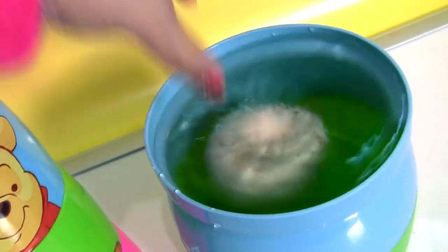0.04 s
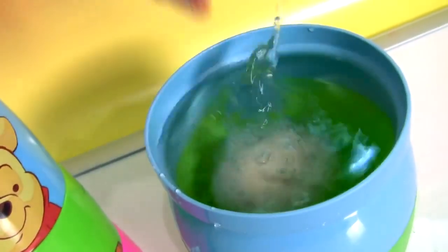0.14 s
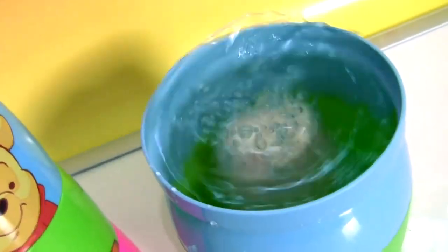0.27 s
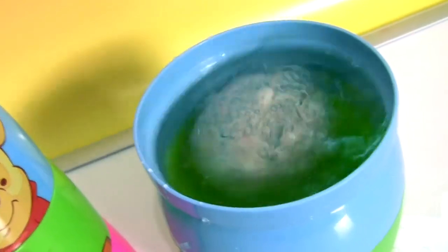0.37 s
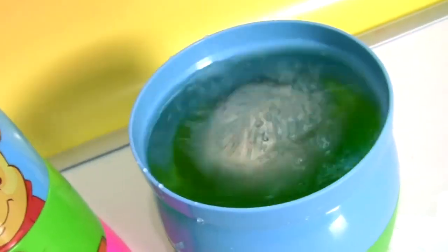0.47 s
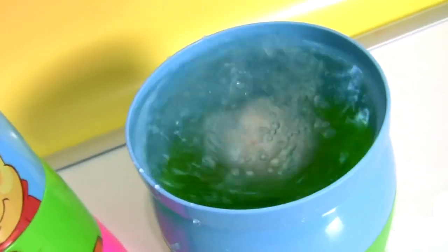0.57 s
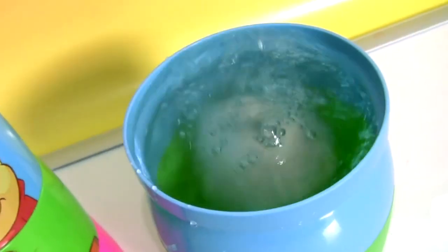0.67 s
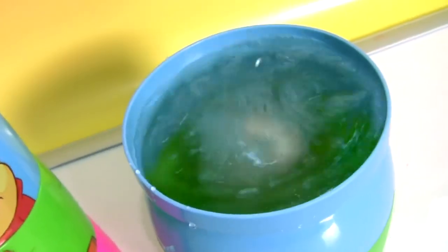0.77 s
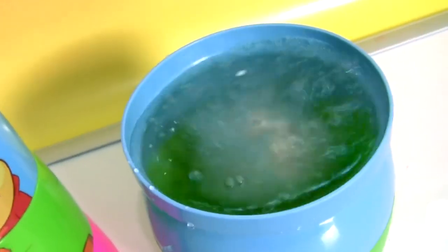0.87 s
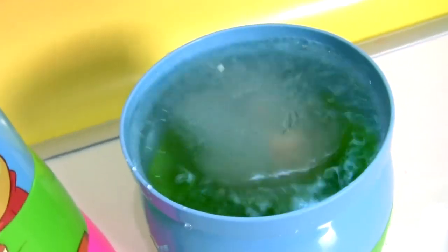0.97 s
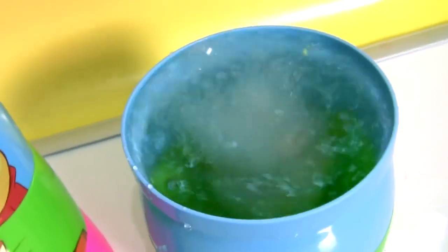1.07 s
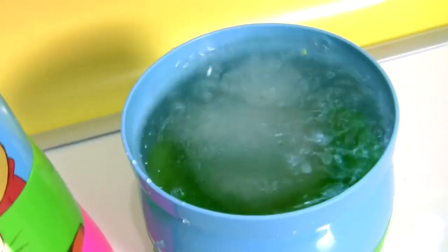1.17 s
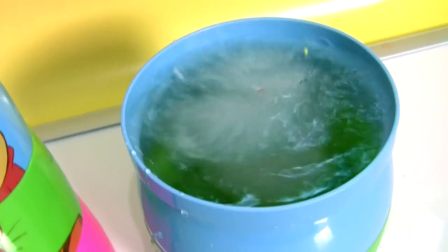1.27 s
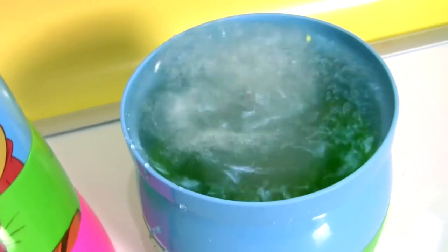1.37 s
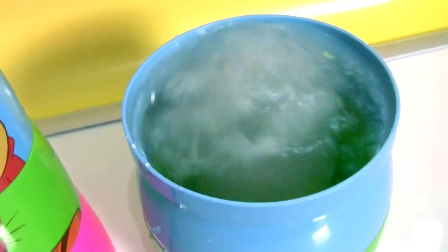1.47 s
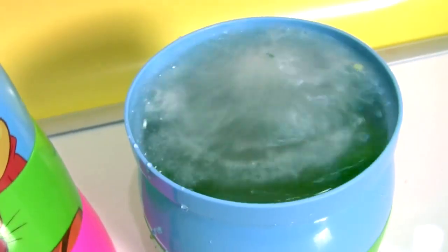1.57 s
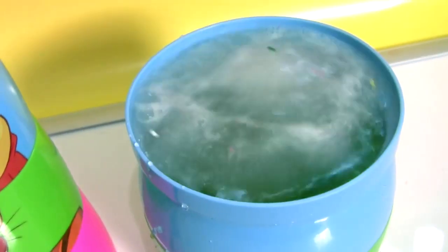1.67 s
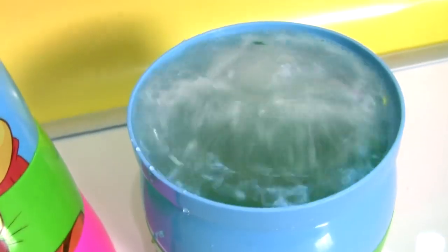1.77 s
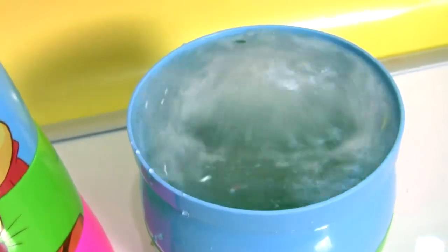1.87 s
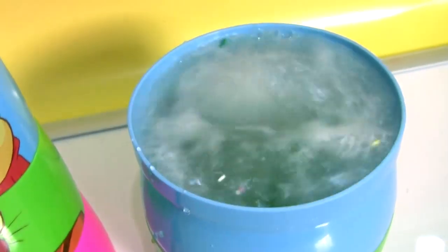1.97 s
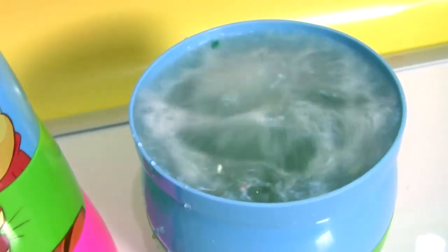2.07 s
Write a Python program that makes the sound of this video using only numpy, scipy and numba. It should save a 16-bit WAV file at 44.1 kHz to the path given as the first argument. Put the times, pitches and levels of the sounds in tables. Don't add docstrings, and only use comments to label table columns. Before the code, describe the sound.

A bath bomb slaps into water in a plastic bowl and knocks the bottom hard, then bumps softly as it rocks; water gurgles, lone bubbles pop, and fizz thickens. Close stereo microphone, small faintly humming room.

```python
import sys
import numpy as np
from scipy import signal
from scipy.fft import rfft, irfft
from scipy.io import wavfile
from scipy.ndimage import uniform_filter1d
from numba import njit

SR = 44100
rng = np.random.default_rng(int(sys.argv[2]) if len(sys.argv) > 2 else 0)


def transcribe(u):
    v = np.clip(np.atleast_2d(u).T, -1, 1)
    q = np.round(v * 32767).astype(np.int16)
    wavfile.write(sys.argv[1], SR, q)


def volts(x):
    e = np.asarray(x, float) / 20
    return 10 ** e


N = 92610

# freq_hz, density_db (per Hz)
HUM_SPECTRUM = [(45, -5.5), (170, -16), (300, -8), (430, -13.5), (740, -21.5), (1600, -18.5), (4500, -33.5),
                (15000, -44.5)]
# time_s, gurgle_level_db, slosh_level_db
STIRRING = [(.0, -63.5, -101), (.2, -57.5, -66.5), (.3, -55, -56), (.6, -58, -56), (.9, -52, -61.5),
            (1.2, -53.5, -75.5), (1.6, -58, -69), (2.1, -58.5, -68)]
# freq_hz, width_hz, level_db
BOWL_HOLLOW = [(120, 21, -11.5), (198, 20, -13), (315, 21, 0), (528, 91, -2.5), (735, 50, 8.5),
               (648, 260, 0.5), (1450, 25, -36)]
# start_s, level_db, centre_hz, rise_s, t60_s
SPLASHES = [(0.1503, -44, 1300, 0.0006, 0.045), (.1496, -47, 6500, .0005, .02),
            (0.2416, -28, 2400, 0.003, 0.05), (.2470, -37, 5400, .0005, 0.015),
            (0.253, -31, 3220, 0.00073, 0.032), (0.257, -42, 1200, 0.0057, 0.28),
            (0.262, -49, 457, 0.0044, 0.66), (.7835, -43, 2400, 0.002, 0.03), (.79, -54, 2500, .004, .15),
            (.256, -46, 2600, .004, .3), (.262, -41, 120, 0.0066, 0.43),
            (0.783, -49.5, 7100, 0.00086, 0.047), (1.1115, -45, 1450, 0.003, 0.035),
            (1.112, -50, 2600, .003, .03), (1.141, -56, 1600, .003, .06), (1.253, -50, 1500, .012, 0.1),
            (1.275, -53, 1700, .004, .03), (1.255, -53, 3000, 0.009, .1)]
# start_s, level_db, pitch_hz,
# length_cycles, pitch_rise (fraction)
DROPS = [(0.1497, -22, 1250, 1.6, 0.054), (.1498, -25, 5500, 1.1, .02), (.1511, -34, 4500, 1.5, .02),
         (.158, -46, 9000, 9., 0.035), (0.1646, -42, 2800, 22, .02), (.168, -54, 6800, 16, .02),
         (.176, -55, 6900, 16, .04), (0.554, -39, 6060, 20, 0.053), (.560, -54, 1950, 30, 0.3),
         (0.571, -40, 1180, 5.5, 0.11), (.613, -54, 2250, 35, 0.25), (.634, -55, 2550, 22, .16),
         (.670, -54, 2300, 38, 0.2), (1.398, -53, 3050, 10, .03), (1.447, -48, 2330, 24, 0.029),
         (1.466, -47.5, 3780, 25, 0.041), (1.5098, -37, 650, 2.6, .05), (1.1132, -44, 1400, 4, .03),
         (1.1157, -45, 2300, 4, .03), (1.665, -42, 2410, 18, 0.03), (.7861, -27, 265, 2.6, 0.013),
         (0.7940, -29, 205, 3.6, .01), (.798, -38, 560, 3, .03), (.813, -38, 215, 2.5, .02),
         (.7842, -36, 3200, 9, .01), (.7848, -36, 2150, 8, .04), (.8062, -46, 4000, 8, .03),
         (1.1412, -36, 600, 2.6, .03), (1.1455, -43, 800, 2.5, .03), (1.956, -46, 5000, 20, .02),
         (.472, -35.5, 267, 2.9, 0.035), (1.148, -44, 230, 8.3, 0.041)]
# start_s, level_db, contact_ms
BOWL_KNOCKS = [
    (0.2439, -15, 1.37),
    (0.2469, -15, 2.3),
    (.2540, -7.5, 1.28),
    (0.258, -18.5, 1.75),
    (0.2795, -44, 4.5),
    (0.787, -39, 1.15),
]
# freq_hz, level_db, t60_s
BOWL_MODES = [(133, 5, 0.062), (199, -2, 0.18), (236.3, 4.5, 0.059), (315.6, 6, 0.0385), (523, 10, 0.029),
              (650, -1, 0.022), (752, -9.5, 0.064), (1058, -12, 0.058), (1253, 11, 0.013),
              (1488, 17.5, 0.02), (1940, -30, 0.0073)]
# time_s, fizz_level_db, spray_level_db, crackle_level_db
FOAM_GROWTH = [(.25, -100, -100, -63), (.36, -81, -94, -81), (.6, -67.5, -71, -79), (.9, -64.5, -72, -65.5),
               (1.15, -65.5, -70.5, -73.5), (1.33, -63.5, -66.5, -67.5), (1.4, -58.5, -66, -73),
               (1.6, -56, -62.5, -76), (1.88, -53, -61, -77), (2.1, -52.5, -58.5, -71)]
# pitch_hz, level_db
FIZZ_SIZES = [(1500, -82), (2400, -14), (4500, -4.5), (7000, -3), (10000, -5.5), (12000, -30)]
# start_s, peak_db, pitch_hz
SURFACE_POPS = [(0.307, -41, 6500), (0.396, -37.5, 9800), (0.4279, -49, 14000), (0.4497, -41.5, 9800),
                (0.4690, -44, 10300), (0.5474, -44, 9600), (0.5546, -37.5, 5940), (0.626, -42, 9870),
                (0.6496, -40, 8450), (0.6864, -41.5, 8350), (0.7617, -61, 8200), (0.8112, -43, 6500),
                (0.8395, -51, 6900), (0.872, -42, 9940), (0.8947, -38.5, 8550), (0.9173, -40, 6250),
                (0.9373, -41, 6200), (0.9945, -39, 8600), (1.018, -41, 8360), (1.0296, -39, 9300),
                (1.0606, -42.5, 6240), (1.1707, -40.5, 10000), (1.3857, -43, 6500), (.3245, -48, 12000),
                (.3285, -47, 13000), (0.4033, -48, 9000), (.440, -46, 4560), (0.4649, -38.5, 4270),
                (.505, -52, 12940), (0.53, -48.5, 3550), (0.5493, -43, 3700), (0.588, -47, 8000),
                (.6335, -44, 14100), (0.6543, -42.5, 3800), (0.676, -40, 13500), (0.702, -42, 12900),
                (0.7283, -43, 13700), (0.7278, -42, 4500), (.7775, -45, 10000), (0.8, -44.5, 7000),
                (.8195, -42, 5460), (.841, -41, 13100), (0.891, -45, 5800), (.901, -40, 13000),
                (.9115, -53, 6500), (.957, -39, 9200), (1.0477, -43, 4200), (1.0926, -48.5, 4360),
                (1.103, -46.5, 7500), (1.139, -47, 9000), (1.184, -48, 13000), (1.2447, -49, 6100),
                (1.3684, -41.5, 4100)]
# freq_hz, gain_db
MIC_RESPONSE = [(2000, -1), (9500, 1), (11500, -2), (13500, 1), (15700, 2), (16300, -48)]

STEREO_WIDTH = 0.88


def level(x, db):
    return x * volts(db) / np.sqrt(np.mean(x ** 2))


def curve(table, axis):
    table = np.array(table, float)
    return volts(np.interp(np.arange(N) / SR, table[:, 0], table[:, axis]))


def band(x, hz, width):
    return signal.lfilter(*signal.iirpeak(min(hz, 0.45 * SR), hz / width, fs=SR), x)


def with_hissy_tail(x, gain, decay_samples):
    shape = (len(x) if gain > 0.2 else 1, 300)
    hiss = gain * rng.standard_normal(shape) * np.exp(-np.arange(300) / decay_samples)
    return x + signal.fftconvolve(x, hiss, axes=1)[:, :N]


@njit
def ring(out, start, hz, cycles, size, rise, side):
    for k in range(len(start)):
        length = cycles[k] * SR / hz[k]
        phase = 0.
        for j in range(min(int(2.5 * length), out.shape[1] - start[k])):
            v = size[k] * np.exp(-2 * j / length) * min(8 * j / length, 1.) * np.sin(phase)
            out[0, start[k] + j] += v * (1 + side[k])
            out[1, start[k] + j] += v * (1 - side[k])
            phase += 2 * np.pi * min(hz[k] * (1 + rise[k] * j / length) / SR, .45)
    return out


def grains(start_s, hz, cycles, size, rise, side):
    one = np.ones(len(start_s))
    start = np.clip(start_s * SR, 0, N - 1).astype(np.int64)
    hz = np.minimum(hz, 0.38 * SR) * one
    return ring(np.zeros((2, N)), start, hz, cycles * one, size * one, rise * one, side * one)


def swarm(count, lo_hz, hi_hz, cycles, spread, rise, colour=None, rare=0.0028):
    when, pitch, loudness, length, place = rng.random((count, 5)).T
    hz = lo_hz * (hi_hz / lo_hz) ** pitch
    db = -spread * np.log(loudness + rare)
    if colour:
        colour_hz, colour_db = np.array(colour).T
        db = db + np.interp(np.log(hz), np.log(colour_hz), colour_db)
    side = STEREO_WIDTH * (2 * place - 1)
    return level(grains(when * N / SR, hz, cycles * (0.5 + length), volts(db), rise, side), 0)


def hum():
    f = np.fft.rfftfreq(N, 1 / SR) + 1
    hz, db = np.array(HUM_SPECTRUM).T
    shape = volts(np.interp(np.log(f), np.log(hz), db))
    shape = shape * f ** 2 / (f ** 2 + 36.0 ** 2)
    mid, side = rfft(rng.standard_normal((2, N))) * shape
    side = side * np.clip(1.35 + f / 1000.0 + 220.0 / f, 0, 0.8)
    return level(irfft(np.array([mid + side, mid - side]), N), -58.5)


def gurgle():
    low = swarm(count=2500, lo_hz=90.0, hi_hz=1690, cycles=1.22, spread=0.61, rise=0.11)
    middle = low.mean(0)
    low = middle + 1.3 * (low - middle)
    hollow = sum(volts(db) * band(low, hz, width) for hz, width, db in BOWL_HOLLOW)
    return level(hollow, 0) * curve(STIRRING, axis=1)


def splashes():
    out, t = np.zeros(N), np.arange(N) / SR
    q = 1.79
    for start_s, db, hz, rise_s, t60_s in SPLASHES:
        age = np.maximum(t - start_s, 0)
        roughness = volts(15.0 * uniform_filter1d(rng.standard_normal(N), size=36))
        noise = rng.standard_normal(N) * roughness
        burst = band(band(noise, hz, hz / q), hz, 2.07 * hz / q)
        swell = np.minimum(age / rise_s, 1) ** 2
        decay = volts(-60 * np.maximum(age - rise_s, 0) / t60_s)
        out += level(burst, db) * swell * decay
    return out


def drops():
    start_s, db, hz, cycles, rise = np.array(DROPS).T
    flutter = volts(8.0 * uniform_filter1d(rng.standard_normal(N), size=144) * 12)
    rising = rise > 0.15
    chirps = grains(start_s, hz, cycles, volts(db) * rising, rise, 0)
    plain = grains(start_s, hz, cycles, volts(db) * ~rising, rise, 0)
    return chirps * flutter + plain


def slosh():
    wash = swarm(count=1800, lo_hz=843, hi_hz=3000, cycles=4.8, spread=1.3, rise=0.1, rare=0.02,
                 colour=[(800, 10), (1500, 4.5), (3000, -4.5)])
    return wash * curve(STIRRING, axis=2)


def knocks():
    push, t = np.zeros(N), np.arange(N) / SR
    for start_s, db, ms in BOWL_KNOCKS:
        contact = np.clip((t - start_s) / ms * 1000, 0, 1)
        push += volts(db) * np.sin(np.pi * contact) ** 2 / ms
    jolt = np.diff(push, prepend=0)
    body = 0
    for hz, db, t60_s in BOWL_MODES:
        r, w = volts(-60 / (t60_s * SR)), 2 * np.pi * hz / SR
        mode = signal.lfilter([1, -r * np.cos(w)], [1, -2 * r * np.cos(w), r * r], jolt)
        body = body + volts(db) * mode
    return 0.41 * body


def table_thump():
    return grains(np.array([0.2490]), hz=42, cycles=0.74, size=volts(-37), rise=0, side=-0.38)


def foam():
    fizz = swarm(count=20000, lo_hz=1490, hi_hz=11480, cycles=15.0, spread=2.0, rise=0.11,
                 colour=FIZZ_SIZES)
    spray = swarm(count=9000, lo_hz=10000, hi_hz=16000, cycles=8.0, spread=2.0, rise=0.05)
    crackle = swarm(count=300, lo_hz=5000, hi_hz=14000, cycles=2.5, spread=2.5, rise=0.1, rare=0.03)
    crackle = crackle * (np.arange(N) > 0.3 * SR)
    crackle = with_hissy_tail(crackle, gain=0.12, decay_samples=70.0)
    crackle = signal.lfilter(*signal.butter(2, 3500.0, "high", fs=SR), crackle)
    swell = volts(1.1 * uniform_filter1d(rng.standard_normal(N), size=2500) * 50)
    fizz = fizz * swell * curve(FOAM_GROWTH, axis=1)
    spray = spray * swell * curve(FOAM_GROWTH, axis=2)
    return fizz + spray + crackle * curve(FOAM_GROWTH, axis=3)


def pops():
    start_s, db, hz = np.array(SURFACE_POPS).T
    length, place = rng.random((len(start_s), 2)).T
    ringing = grains(start_s, hz, 5.0 * (0.2 + length), volts(db), 0.031, 0.9 * (place - 0.5))
    tick = grains(start_s + 0.0004, 10100.0, 2.7, volts(db - 4.5), 0, 0)
    late_tick = grains(start_s + 0.0011, 14200.0, 3.5, volts(db - 10), 0, 0.6 * (length - 0.5))
    return with_hissy_tail(ringing + tick + late_tick, gain=0.21, decay_samples=60.0)


def room(x):
    t60_s, tail_db, dull_hz = 0.39, -23, 1680
    t = np.arange(int(0.7 * SR)) / SR
    envelope = volts(-60 * t / t60_s) * np.clip(t / 0.0043 - 0.3, 0, 1)
    mid, side = rng.standard_normal((2, len(t))) * envelope
    tail = np.array([mid + 0.25 * side, mid - 0.39 * side])
    tail = signal.lfilter(*signal.butter(1, dull_hz, fs=SR), tail)
    tail = volts(tail_db) * tail / np.sqrt(np.sum(tail ** 2) / 2)
    return signal.fftconvolve(x, tail, axes=1)[:, :N]


def scene():
    water = gurgle() + slosh() + drops() + splashes()
    near = water + knocks() + table_thump() + foam() + pops()
    return (near + room(near) + hum()) * volts(np.array([[-1], [1]]))


def band_limit(x):
    return signal.sosfilt(signal.butter(12, 16610, fs=SR, output="sos"), x)


def record(dry):
    f = np.fft.rfftfreq(N, 1 / SR)
    left_treble_db = 13 * np.clip(f / 18000.0 - 0.6, 0, 1)
    colour = np.interp(f, *np.array(MIC_RESPONSE).T) + np.array([[1], [0]]) * left_treble_db
    left, right = irfft(rfft(dry) * volts(colour), N)
    left = signal.lfilter(*signal.butter(1, 70.0, "high", fs=SR), left)
    mix = np.tanh(1.273 * np.array([left, right])) / 1.493
    return band_limit(mix)


dry = scene()
out = record(dry)
transcribe(out)
```